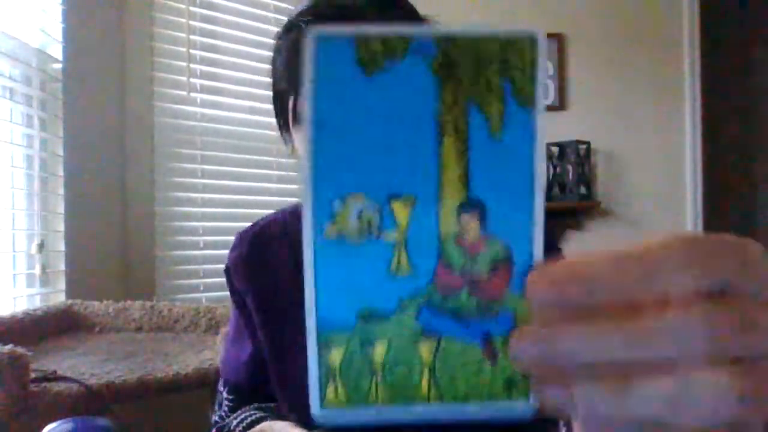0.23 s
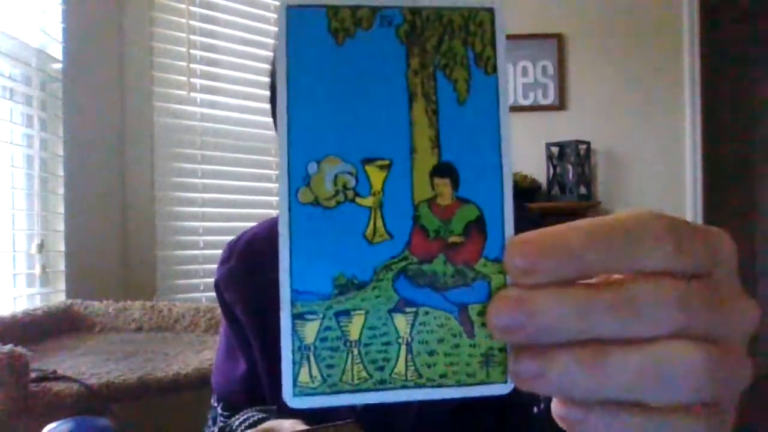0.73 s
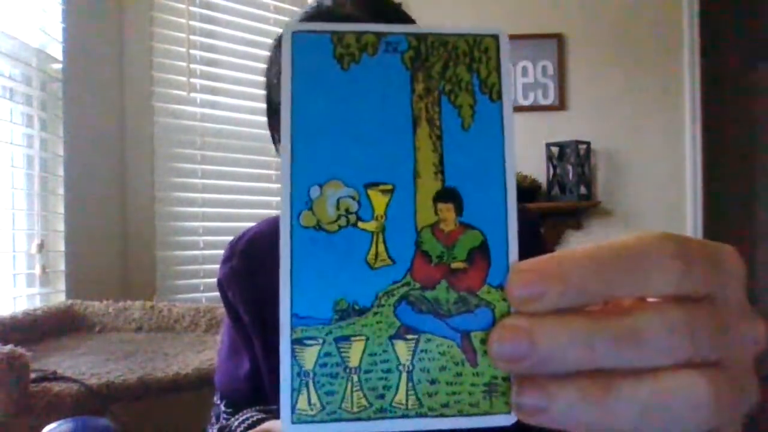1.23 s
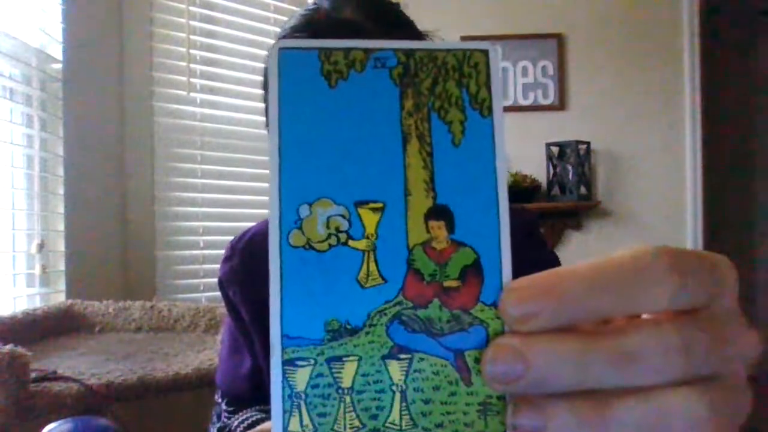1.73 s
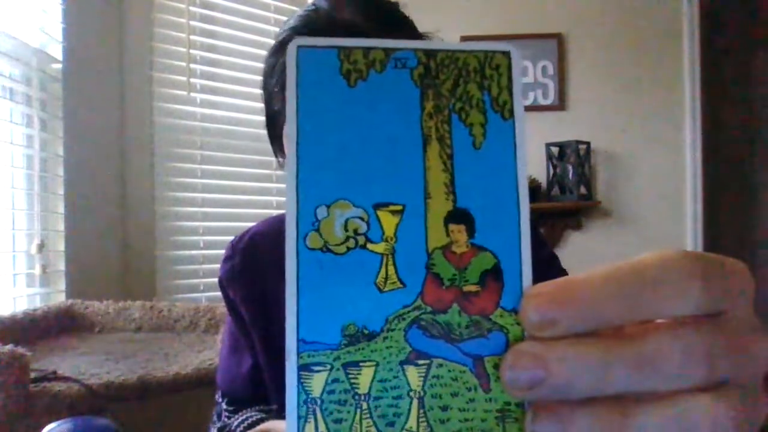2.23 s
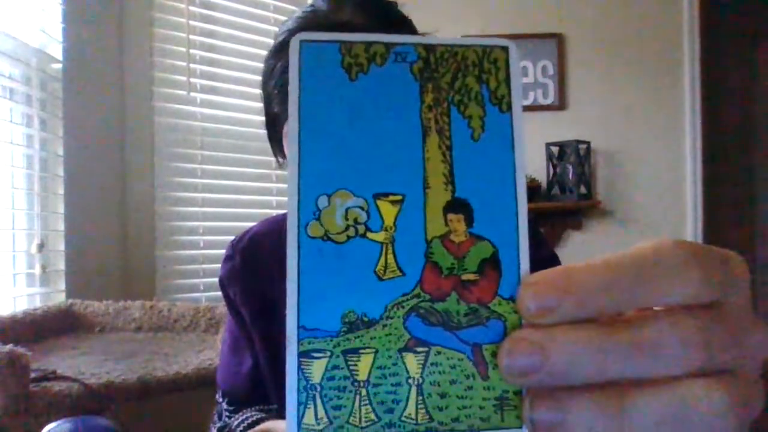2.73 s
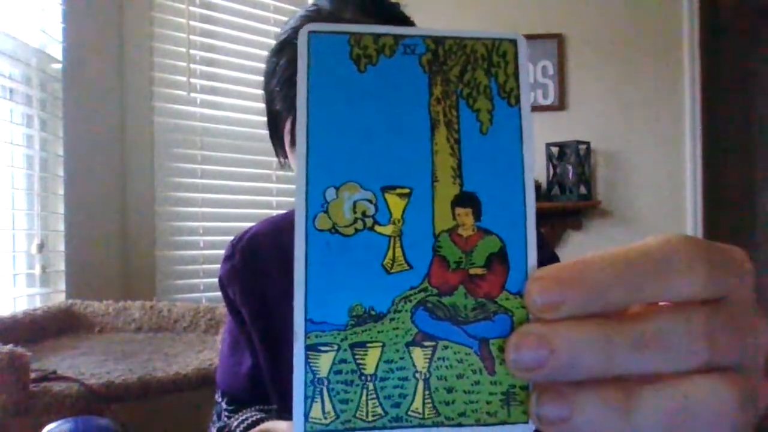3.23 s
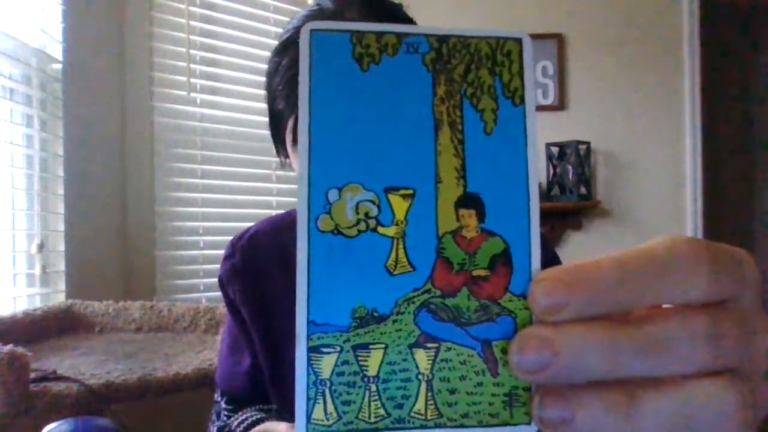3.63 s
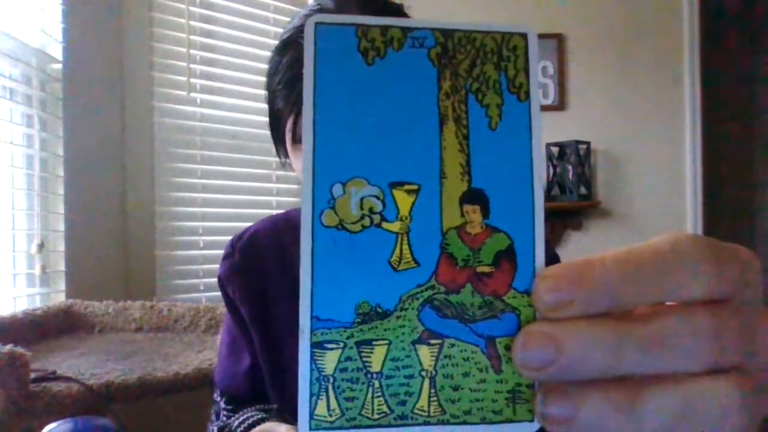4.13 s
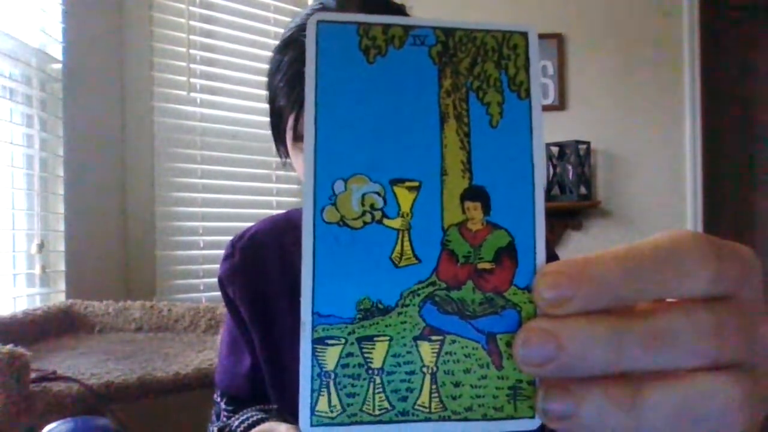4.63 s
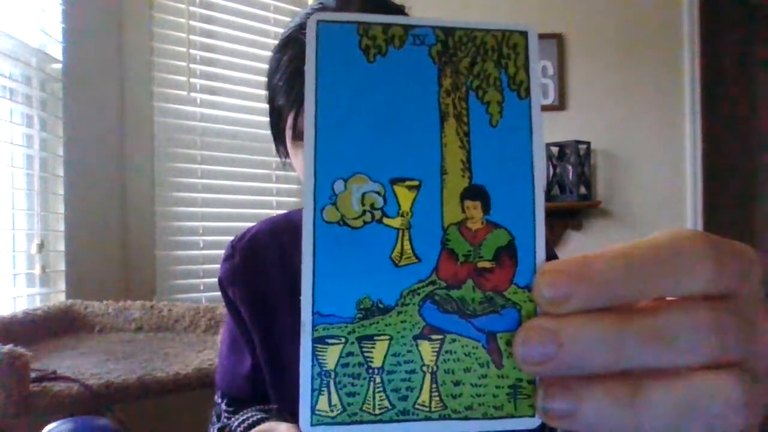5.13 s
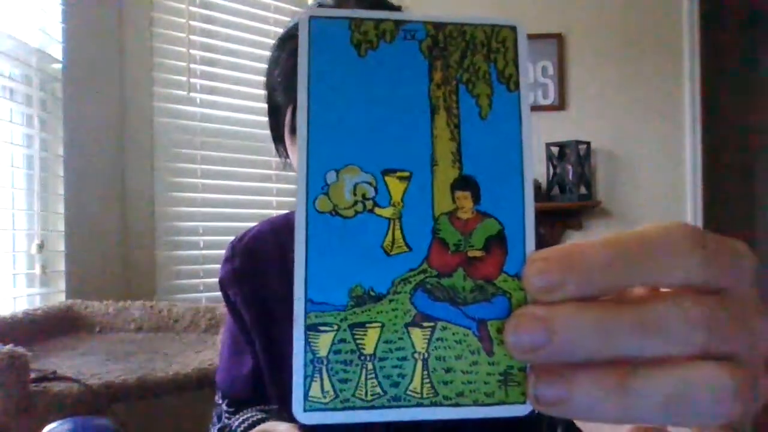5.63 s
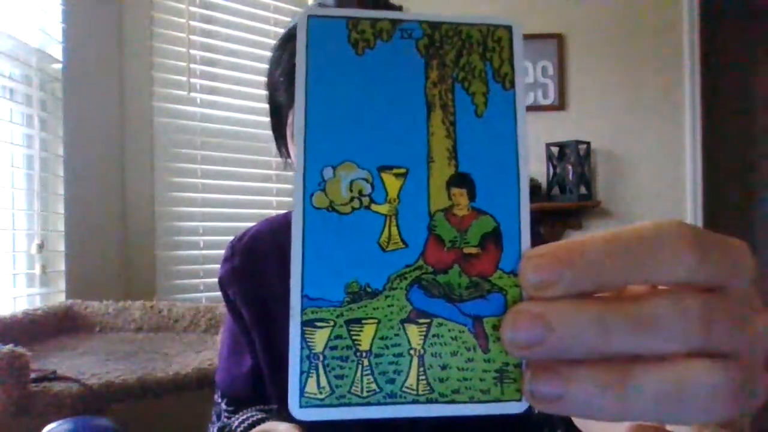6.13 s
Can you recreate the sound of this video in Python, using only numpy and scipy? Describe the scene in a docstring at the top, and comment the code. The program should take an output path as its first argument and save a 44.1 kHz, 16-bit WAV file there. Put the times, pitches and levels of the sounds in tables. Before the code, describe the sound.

Heard through a small computer microphone in a quiet room, a deep, muffled engine outside dips in revs, slowly pulls up and finally eases off. Close by, a card is handled at the start with soft thuds, taps and a quick scrape, followed by a few sparse finger ticks. Underneath lie a faint wavering appliance hum, rumbling air and thin hiss with fine crackle.

```python
"""A quiet room, heard through a small computer microphone. An engine outside, only its lowest orders
passing the walls, drops in revs at a gear change while a card is lifted to the camera with dull bumps,
a scrape and light taps. The engine pulls slowly up through one gear, swelling in the room's bass
resonances, as fingers now and then tick on the card. Near the end it is let off and drops again.
Under it all: a slow throb, a faint appliance hum, rumbling air and hiss with fine crackle."""
import sys
import numpy as np
from scipy import signal
from scipy.fft import rfft, irfft
from scipy.io import wavfile
from scipy.ndimage import uniform_filter1d

SR = 44100
rng = np.random.default_rng(int(sys.argv[2]) if len(sys.argv) > 2 else 0)


def inscribe(sig):
    """Save sig as 16-bit PCM at rate SR to the path in sys.argv[1].

    A 1-D sig is mono; a 2-D sig holds one channel per row.
    Samples are clipped to [-1, 1] before scaling.
    """
    pcm = np.round(np.clip(np.atleast_2d(sig).T, -1, 1) * 32767)
    wavfile.write(sys.argv[1], SR, pcm.astype(np.int16))


N = 280784
TIME, BIN_HZ = np.arange(N) / SR, np.fft.rfftfreq(N, 1 / SR)

# The revs drop, climb slowly and drop again: time_s, crank_hz
REVS = [(0, 31), (.13, 30.3), (.22, 26), (.33, 18.6), (.45, 21.1), (.53, 19.2), (.77, 20), (1, 21.6),
        (1.2, 22.3), (1.5, 24), (2, 25.6), (2.5, 26.8), (3.1, 26.6), (3.9, 27), (4.5, 28.2), (5.3, 29.9),
        (5.55, 29.6), (5.8, 27.9), (6, 25.8), (6.12, 22), (6.37, 21.7)]
# The pull, hard and jerky at low revs, easier when cruising: time_s, load_db
ENGINE_LOAD = [(0, 1.5), (.36, -0.5), (.45, 1), (.58, 5), (.66, 0), (.9, 0), (1.05, 1), (2.05, 1.5),
               (2.55, -7), (3.3, -6), (4.5, -1.5), (6, -6.5), (6.25, -9)]
# The body of the drone; even orders grow with load, the odd one comes out as it eases:
# order, level_db, db_per_load_db, stereo_share
STRONG_ORDERS = [(2, -38, 1, 0.08), (4, -38.5, 1.26, 0.1), (5, -63.5, -1.22, 0), (6, -47, 0.3, 0.03)]
# Filler that follows the body's level: order, relative_db
FILL_ORDERS = [(1, -14.5), (3, -21.5), (7, -30), (8, -21)]
# How walls and room colour the filler: frequency_hz, gain_db
WALL_EQ = [(25, 4), (75, -7.5), (155, 7), (178, -1), (192, -2), (207, -14.5), (235, -16), (275, -4),
           (340, 5)]
def engine(level_db=-1.28, shake=0.14, shake_hz=9, fill_stereo_share=0.025):
    """Multiples of the crank speed follow the load and swell as they glide through room resonances."""
    crank_hz, load_db = curves(REVS)[0], curves(ENGINE_LOAD)[0]
    crank_angle = 2 * np.pi * np.cumsum(crank_hz) / SR
    strong = [(order, amp(db + follow * load_db + room_gain_db(order * crank_hz)), share)
              for order, db, follow, share in STRONG_ORDERS]
    body_gain = np.linalg.norm([gain for _, gain, _ in strong], axis=0)
    fill = [(order, body_gain * amp(db + at_hz(WALL_EQ, order * crank_hz)), fill_stereo_share)
            for order, db in FILL_ORDERS]
    lugging = 0.25 * np.exp(-((crank_hz - 18.45) / 1.8) ** 2)  # extra shudder at the lowest revs
    out = np.zeros((2, N))
    for order, gain, share in strong + fill:
        uneven = 1 + (shake + lugging) * wobble(shake_hz)  # no two firings are alike
        ports = 1 + 1j * share * np.outer([1, -1], drift(1.0))  # one port hears it a little earlier
        tone = np.exp(1j * (order * crank_angle + 2 * np.pi * rng.random()))
        out += gain * (ports * uneven * tone).real
    return np.sqrt(2) * amp(level_db + gear_dip_db()) * out


# The engine is let off, then bites again: let_off_s, bite_s, depth_db
GEAR_CHANGES = [(0.088, 0.257, -8.5), (5.45, 6.05, -5)]
def gear_dip_db(recover_s=0.071):
    """Each gear change fades the engine slowly; it returns quickly as it takes up the load."""
    return sum(np.interp(TIME, [let_off, bite, bite + recover_s], [0, depth, 0])
               for let_off, bite, depth in GEAR_CHANGES)


# Where the room booms: centre_hz, width_hz, gain_db
BASS_MODES = [(40.8, 3.3, 0), (49.27, 4.45, 11.5), (60.46, 3.4, 5.5), (80.3, 11, 2.2), (90.6, 10, 1),
              (100.4, 5.4, -2.5), (109.55, 5.5, 1), (113.55, 7.6, 4.5), (132.8, 11, 11.5),
              (151.5, 6.23, 11.5)]
def room_gain_db(hz, lag_s=0.22):
    """Steep room resonances lift a gliding tone, taking time to build up and die away."""
    power = sum(amp(db) ** 2 * resonance(hz, centre, width) ** 2 for centre, width, db in BASS_MODES)
    return uniform_filter1d(10 * np.log10(power), round(lag_s * SR))


# Dull thuds: start_s, level_db, pitch_hz
CARD_BUMPS = [(0.554, -27.5, 60), (0.6, -22.5, 50), (0.669, -28, 48), (0.767, -25, 55),
              (0.984, -26.5, 44.2)]
def bumps(rise_s=0.00395, decay_s=0.009):
    """Lifting the card into place gives soft low pushes that die within a cycle or two."""
    t, out = np.arange(SR // 5) / SR, np.zeros(N)
    for start, db, hz in CARD_BUMPS:
        add(out, start, amp(db) * burst(t, rise_s, decay_s) * np.sin(2 * np.pi * hz * t))
    return out


# Small taps, one row per ringing note: start_s, level_db, pitch_hz, decay_s
CARD_TAPS = [(.104, -47, 1540, .0035), (.106, -58, 1445, 0.018), (2.3393, -50, 2300, .0008),
             (2.339, -61, 4550, .0012), (2.3693, -47, 1820, 0.0009), (2.369, -59, 2800, .0015),
             (2.372, -59, 1095, .008), (6.042, -52, 1380, .002), (6.042, -52, 1860, .002),
             (6.0415, -58, 2680, .0015)]
def taps(rise_s=0.00058):
    """Light contacts on the card ring briefly with a clear pitch."""
    t, out = np.arange(SR // 10) / SR, np.zeros(N)
    for start, db, hz, decay in CARD_TAPS:
        add(out, start, np.sqrt(2) * amp(db) * burst(t, rise_s, decay) * np.sin(2 * np.pi * hz * t))
    return out


# Noisy finger ticks: start_s, level_db, ring_hz, width_hz, decay_s
FINGER_SCUFFS = [(.397, -49, 6200, 5500, 0.0014), (.398, -51.5, 7400, 800, 0.0055),
                 (.450, -56.5, 1860, 290, .033), (1.009, -53, 1120, 400, 0.0075),
                 (1.848, -59.5, 5300, 2600, .002), (2.345, -66, 2550, 600, .018),
                 (3.074, -62, 2200, 1500, 0.0035), (3.153, -61.5, 3500, 1200, 0.004)]
def scuffs(side_share=0.3, rise_share=0.66):
    """Fingers shift on the card: each scuff is a burst of noise in one resonance."""
    t, hz = np.arange(8192) / SR, np.fft.rfftfreq(8192, 1 / SR)
    out = np.zeros((2, N))
    for start, db, ring_hz, width_hz, decay in FINGER_SCUFFS:
        noise = rng.standard_normal((2, len(t)))
        mid, side = unit(irfft(rfft(noise) * resonance(hz, ring_hz, width_hz)))
        add(out, start, amp(db) * burst(t, rise_share * decay, decay) * stereo(mid, side_share * side))
    return out


# One quick scrape and two faint rustles: start_s, level_db, rise_s, decay_s
FINGER_SLIDES = [(0.2636, -51.5, 0.014, 0.016), (0.12, -66, 0.38, 0.14), (0.97, -72, 0.11, 0.23)]
# The voice of the rubbed card: centre_hz, width_hz, gain_db
CARD_RESONANCES = [(1105, 190, 7), (1840, 300, 3.5), (2470, 280, 0), (3280, 490, -6), (4420, 450, -7),
                   (6060, 1400, -13), (10500, 6000, -14.5)]
def sliding(slips_per_s=1800, side_share=0.26):
    """Skin catches and slips on the card: a dense run of tiny clicks rings its modes."""
    slips = (rng.random((2, N)) < slips_per_s / SR) * rng.choice([-1, 1], (2, N))
    body = unit(sum(amp(db) * resonance(BIN_HZ, centre, width) for centre, width, db in CARD_RESONANCES))
    pressure = sum(amp(db) * burst(TIME - start, rise, decay) for start, db, rise, decay in FINGER_SLIDES)
    mid, side = irfft(rfft(unit(slips) * pressure) * body, N)
    return stereo(mid, side_share * side)


def throb(pulse_hz=10.9, level_db=-30, waver=0.18, waver_hz=12.4):
    """The air in the room pulses about eleven times a second, below hearing."""
    uneven = 1 + waver * wobble(waver_hz)
    return amp(level_db) * unit((uneven * np.exp(2j * np.pi * pulse_hz * TIME)).real)


# The notes of the hum: pitch_hz, level_db, unsteady_share, waver_hz
HUM_TONES = [(119.6, -59.5, 0.56, 3.8), (186.9, -59.5, 0.68, 7), (236.2, -59.5, 0.35, 3.3),
             (276.3, -64, 0.75, 2.5), (330.5, -65.5, 0.98, 8.4), (357.5, -64.5, 0.46, 2.7),
             (373, -74, 0.95, 2.2), (392.6, -62, 0.71, 3.9), (448.3, -74, 0.9, 7.4), (475, -86, 0.3, 3),
             (558, -77, 0.7, 2.2), (652, -75, 0.9, 11), (910, -77.5, 0.78, 6.4), (1002, -73.5, 0.47, 2.7)]
# The hum swells and sinks: time_s, lower_tones_db, upper_tones_db
HUM_SWELLS = [(0, 2.5, -.5), (1, -1.5, -2), (2.2, 2, 1.5), (2.6, 1.5, -1.5), (3.3, -5.5, 1),
              (4.3, 0.5, 0.5), (5, 1, -0.5), (5.6, -1, 0), (6.37, -0.5, 2)]
def appliance(wander_cents=3, wander_hz=2.49, split_hz=300, whine_hz=12000, whine_db=-85):
    """Faint motor tones waver in strength and pitch under a thin electronic whine."""
    out = amp(whine_db) * unit(np.sin(2 * np.pi * whine_hz * TIME))
    lower_db, upper_db = curves(HUM_SWELLS)
    for hz, db, unsteady, waver_hz in HUM_TONES:
        waver = 1 - unsteady + unsteady * wobble(waver_hz) / np.sqrt(2)
        bend = 2 ** (wander_cents * drift(wander_hz) / 1200)
        cycles = np.cumsum(hz * bend) / SR + rng.random()
        tone = unit((waver * np.exp(2j * np.pi * cycles)).real)
        out += amp(db + (lower_db if hz < split_hz else upper_db)) * tone
    return out


# Deep rumble: frequency_hz, gain_db
RUMBLE_EQ = [(5, 9.5), (16, 14), (21, -5), (27, -11), (35, 4), (60, -0.5), (80, -2.5), (100, -11), (130, 1),
             (155, -6), (175, -12.5), (210, -14.5), (400, -57), (1000, -53.5)]
# Soft, dark wash: frequency_hz, gain_db
WASH_EQ = [(20, 1.5), (160, 3.5), (207, -12.5), (228, 9.5), (252, 9), (305, 3), (340, 5), (382, 0),
           (408, 3.5), (432, -4.5), (510, -7), (595, -7), (660, -6.5), (1100, -8.5), (1850, -16),
           (2300, -19.5), (4000, -24), (12000, -35.5)]
def room_air(settle_s=2.35, swell_at_s=1.53, swell_width_s=0.72):
    """Rumble through the walls starts stronger and settles; a soft wash swells once."""
    rumble_db = -41 + 5.5 * np.exp(-TIME / settle_s)
    wash_db = -52.5 + 1.9 * np.exp(-((TIME - swell_at_s) / swell_width_s) ** 2)
    return amp(rumble_db) * diffuse(RUMBLE_EQ) + amp(wash_db) * diffuse(WASH_EQ)


# Bright noise floor: frequency_hz, gain_db
HISS_EQ = [(200, -5), (2000, -9), (5000, -6.5), (6200, -4.5), (7400, -5), (8500, -5), (10500, -3.5),
           (12500, -2.5), (15500, 1)]
# The crackles that stand out: start_s, relative_db
MAIN_CRACKLES = [(0.0912, -47), (0.15, -44), (0.2428, -47), (0.2823, -48.5), (0.397, -44), (0.5142, -46.5),
                 (0.5891, -51), (0.8754, -44.5), (0.9492, -43), (1.1134, -46.5), (1.1383, -47),
                 (1.297, -43), (1.4247, -45), (1.4504, -43), (1.5897, -44.5), (1.7324, -47), (1.934, -44),
                 (2.0438, -46), (2.1794, -47), (2.379, -45), (2.5577, -41.5), (2.6693, -46), (2.747, -43),
                 (2.8145, -55), (2.8669, -46), (3.0051, -46), (3.1512, -44), (3.2605, -54), (3.3643, -42),
                 (3.4092, -41.5), (3.4935, -48), (3.6421, -45), (4.1844, -45), (4.32, -46), (4.3435, -47),
                 (4.4528, -45), (4.999, -45), (5.1626, -42), (5.1851, -43), (5.445, -46), (5.462, -44),
                 (5.5716, -47), (5.7957, -46), (6.1584, -45), (6.2864, -44), (6.342, -46.5)]
# Their thin sizzle: frequency_hz, gain_db
CRACKLE_EQ = [(3000, -36), (6500, -10), (8500, -5.5), (10300, 3), (12000, -1), (13500, 3.5), (15500, 0.5)]
def hiss(level_db=-61, flicker_db=1.62, flicker_hz=32, faint_per_s=10, crackle_gain_db=-5.5):
    """Microphone hiss flickers and spits tiny bursts of treble, the fainter ones at random."""
    sparks = (rng.random(N) < faint_per_s / SR) * amp(-49.5 - 1.5 * rng.uniform(-0.64, 1, N))
    for start, db in MAIN_CRACKLES:
        add(sparks, start, amp([db]))
    spit = burst(np.arange(SR // 20) / SR, rise_s=0.001, decay_s=0.0034)
    envelope = signal.oaconvolve(sparks, spit)[:N]
    floor = amp(level_db + flicker_db * drift(flicker_hz)) * diffuse(HISS_EQ)
    return floor + amp(crackle_gain_db) * envelope * diffuse(CRACKLE_EQ)


# Stereo image of the noise beds: frequency_hz, left_right_correlation
PORT_LIKENESS = [(30, .998), (60, .982), (130, .99), (300, .96), (640, .87), (1400, .7), (2400, .33),
                 (3300, .05), (5800, -.05), (6600, .25), (7100, .8), (10000, .8), (15000, .7)]
def diffuse(eq):
    """Coloured noise at two microphone ports, near mono in the bass and widest around 3-6 kHz."""
    likeness = at_hz(PORT_LIKENESS, BIN_HZ)
    mid, side = rfft(rng.standard_normal((2, N))) * np.sqrt([1 + likeness, 1 - likeness])
    return unit(irfft(stereo(mid, side) * amp(at_hz(eq, BIN_HZ)), N))


def in_room(x, wet_db=-12, t60_s=0.25, predelay_s=0.0027):
    """Adds the short tail of a furnished room, different at each port."""
    t = np.arange(SR // 2) / SR
    tail = rng.standard_normal((2, len(t))) * amp(-60 * t / t60_s) * (t > predelay_s)
    tail /= np.linalg.norm(tail, axis=1, keepdims=True)
    return x + amp(wet_db) * signal.oaconvolve(x, tail, axes=1)[:, :N]


def amp(db):
    """Decibels to gain."""
    return 10 ** (np.asarray(db) / 20)


def unit(x):
    """Scales to an rms of one."""
    return x / np.sqrt(np.mean(x ** 2) + 1e-20)


def stereo(mid, side):
    """Mid and side to left and right."""
    return np.array([mid + side, mid - side])


def resonance(hz, centre_hz, width_hz):
    """A peak of height one, width_hz wide at half height."""
    return 1 / (1 + (2 * (hz - centre_hz) / width_hz) ** 2)


def at_hz(points, hz):
    """Reads a curve on a log-frequency axis."""
    point_hz, value = np.transpose(points)
    return np.interp(np.log(hz + 1), np.log(point_hz + 1), value)


def curves(rows):
    """The columns of a time table, one value a sample."""
    time_s, *columns = np.transpose(rows)
    return [np.interp(TIME, time_s, column) for column in columns]


def drift(rate_hz):
    """Smooth random motion of rms one, rolling off above the rate."""
    return unit(irfft(rfft(rng.standard_normal(N)) * np.exp(-(BIN_HZ / rate_hz) ** 2), N))


def wobble(rate_hz):
    """Complex drift that shakes a tone's strength and phase."""
    return drift(rate_hz) + 1j * drift(rate_hz)


def burst(t, rise_s, decay_s):
    """A straight rise, then an exponential fall."""
    return np.clip(t / rise_s, 0, 1) * np.exp(-np.maximum(t - rise_s, 0) / decay_s)


def add(mix, start_s, sound):
    """Mixes a sound in at a time."""
    part = mix[..., round(start_s * SR):][..., :sound.shape[-1]]
    part += sound[..., :part.shape[-1]]


def scene():
    """Engine and card over the room's background, at both microphone ports."""
    foreground = engine() + bumps() + in_room(taps() + scuffs() + sliding())
    return foreground + throb() + appliance() + room_air() + hiss()


def record(dry, cutoff_hz=15800, fade_s=0.004):
    """A tiny fade at each end and a steep treble cut."""
    lowpass = signal.firwin(801, cutoff_hz, window=("kaiser", 9), fs=SR)
    fade = np.sin(np.pi / 2 * np.clip(np.minimum(TIME, TIME[::-1]) / fade_s, 0, 1)) ** 2
    return signal.oaconvolve(dry * fade, lowpass[None], "same")


dry = scene()
out = record(dry)
inscribe(out)
```